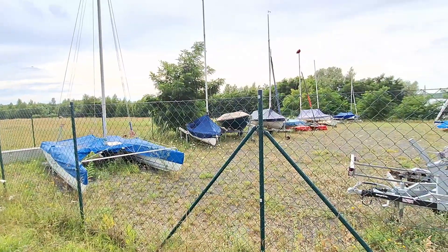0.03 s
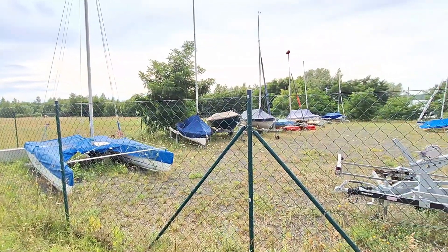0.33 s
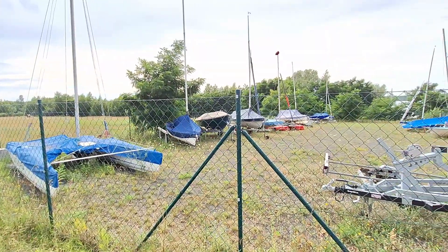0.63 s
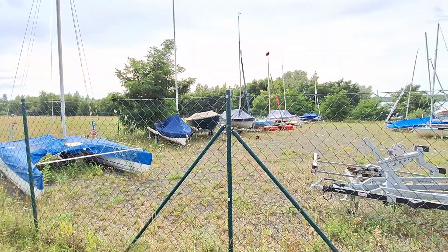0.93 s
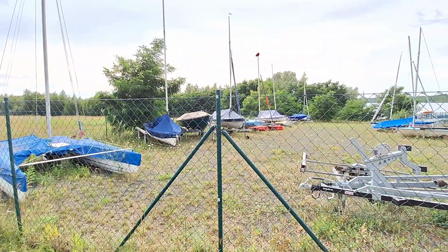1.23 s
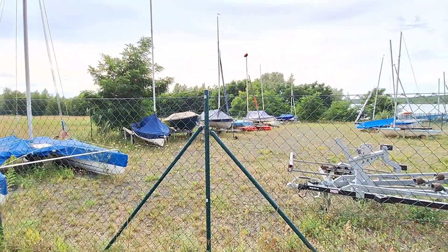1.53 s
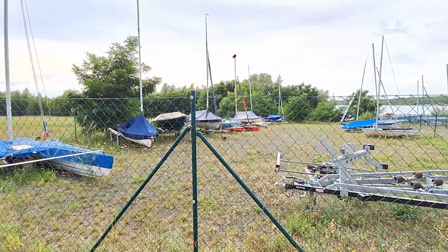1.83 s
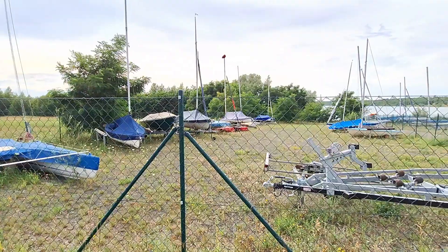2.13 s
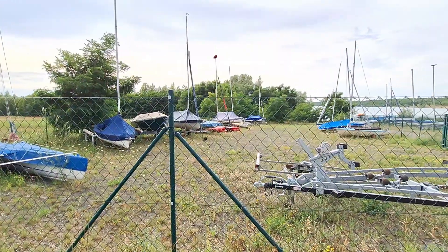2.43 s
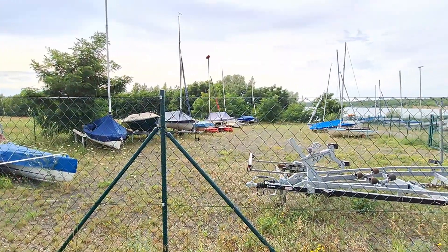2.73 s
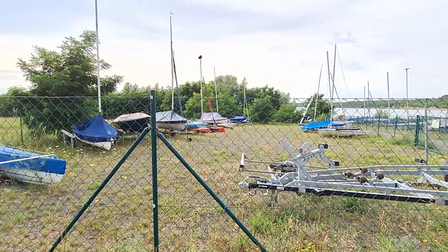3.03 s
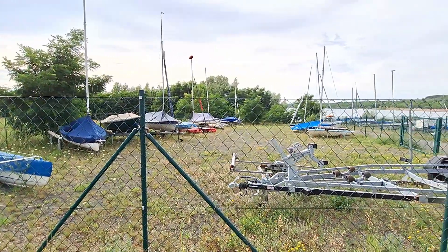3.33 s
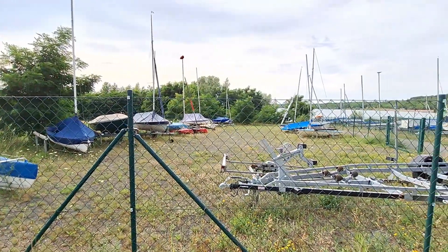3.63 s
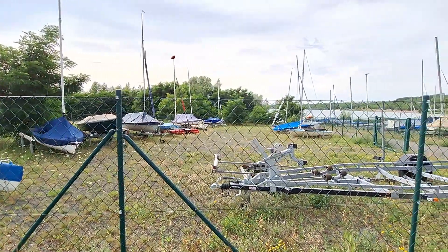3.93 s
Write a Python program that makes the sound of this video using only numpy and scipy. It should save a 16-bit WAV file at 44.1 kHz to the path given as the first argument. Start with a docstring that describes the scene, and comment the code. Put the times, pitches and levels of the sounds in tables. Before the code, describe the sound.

A wire clinks against a nearby metal mast in small clusters about once a second, ringing briefly. Wind rumbles and thumps on the microphone throughout, stronger near the end, with a faint distant rush around the boat yard.

```python
"""Halyard on a mast in a boat yard

About once a second a breeze swings a halyard against a metal mast, which clinks a few times and rings.
Wind buffets both microphone ports. Further off are light taps on another boat, bush crickets in the
grass, rustling leaves, a few faint bird whistles and the distant rush of trees and open land."""
import sys
import numpy as np
from scipy import signal
from scipy.fft import rfft, irfft, next_fast_len
from scipy.io import wavfile
from scipy.ndimage import uniform_filter1d, map_coordinates

SR = 44100
rng = np.random.default_rng(int(sys.argv[2]) if len(sys.argv) > 2 else 0)


def wav_out(sig):
    """Save sig, one row per channel (or a flat mono array), as 16-bit PCM at SR to the path in sys.argv[1]."""
    wavfile.write(sys.argv[1], SR, np.round(np.clip(np.atleast_2d(sig).T, -1, 1) * 32767).astype(np.int16))


N = 176400

NEAR_LEAD_S, FAR_LEAD_S = 0.000362, 0.00036  # how much earlier the left port hears a source
FAR_ALIKE = 0.3  # share of distant noise common to both ports
ATTACK_S = 0.0025  # rise time of struck metal


def amp(db):
    """Decibels to gain."""
    return 10 ** (np.asarray(db) / 20)


def unit(x):
    """Scale to rms 1."""
    return x / np.sqrt(np.mean(x ** 2) + 1e-20)


def along(points, hz):
    """Interpolate (frequency [Hz], value) points on a log axis."""
    f, v = np.transpose(points)
    return np.interp(np.log(hz + 1), np.log(f + 1), v)


def curve(points):
    """Interpolate (time [s], value) points to one value per sample."""
    return np.interp(np.arange(N) / SR, *np.transpose(points))


def wobble(rate):
    """A smooth random curve, rate knots a second."""
    return map_coordinates(rng.standard_normal(2048), [np.arange(N) * rate / SR], mode="mirror")


def fade(t, t60):
    """Exponential decay by 60 dB in t60 seconds."""
    return np.exp(-np.log(1000) * t / t60)


def filtered(x, response):
    """Filter x by a complex response of frequency."""
    size = next_fast_len(N + SR // 4)
    return irfft(rfft(x, size) * response(np.fft.rfftfreq(size, 1 / SR)), size)[..., :N]


def pan(db):
    """Constant-power gains for a level difference, left minus right."""
    gains = amp(np.array([[.5], [-.5]]) * db)
    return gains / np.sqrt(np.mean(gains ** 2, axis=0))


def lead(x, seconds):
    """The left port hears x earlier than the right."""
    return filtered(x, lambda hz: np.exp(1j * np.pi * hz * seconds * np.array([[1], [-1]])))


def noise(colour, alike=0):
    """Coloured stereo noise of rms 1; alike is the share common to both ports."""
    white = rng.standard_normal((3, N))
    stereo = np.sqrt(1 - alike) * white[:2] + np.sqrt(alike) * white[2]
    return unit(filtered(stereo, lambda hz: amp(along(colour, hz))))


def even(x):
    """Noise with its slow swells levelled out."""
    power = uniform_filter1d(uniform_filter1d(x ** 2, size=700, axis=1), size=500, axis=1)
    return x / np.sqrt(np.abs(power) + 1e-6)


def distant_rush():
    """Trees and open land, far from the microphone, give a steady rush."""
    # (time [s], relative level [dB])
    levels = [(0.0, -54.5), (0.21, -55), (0.48, -57), (0.95, -56.5), (2.39, -55.5), (2.67, -57.5),
              (4.0, -55)]
    # spectrum (frequency [Hz], level [dB])
    colour = [(100, 14), (280, 4.5), (360, 0.5), (420, 5), (500, -2.5), (750, 0), (1100, 2), (1550, -2),
              (2000, -1), (2500, -15.5), (3200, -27), (5000, -30.5), (9000, -68)]
    # stereo image (frequency [Hz], left minus right [dB])
    balance = [(380, 0.5), (700, 2.5), (1300, -4), (2400, -7.5), (4400, -61)]
    rush = lead(noise(colour, FAR_ALIKE), FAR_LEAD_S)
    rush = filtered(rush, lambda hz: pan(along(balance, hz)))
    return amp(curve(levels) + 6.5 + 0.74 * wobble(7.5)) * rush


def hiss():
    """A faint, wide hiss hangs behind the yard."""
    # (time [s], level [dB])
    levels = [(0, -69.5), (.6, -71), (1.3, -68), (2, -67), (2.7, -67), (3.2, -64), (4, -68)]
    # spectrum (frequency [Hz], level [dB])
    colour = [(2000, -1.5), (3500, -4), (4800, -2), (5800, 3), (7300, -1), (8050, 5), (8500, -1),
              (9200, -7.5), (11500, -7.5), (15500, -6.5)]
    return amp(curve(levels) + 0.37 * wobble(12)) * pan(-1.0) * noise(colour)


def leaves():
    """Foliage off to the right rustles as the breeze comes and goes."""
    # (time [s], relative level [dB])
    levels = [(0, -60.5), (.2, -59.5), (.45, -64.5), (1, -67.5), (1.35, -68.5), (1.9, -73.5), (2.25, -67),
              (3.1, -65), (3.5, -75), (4, -60)]
    # spectrum (frequency [Hz], level [dB])
    colour = [(1200, -18.5), (2100, 2.5), (2600, -1.5), (3100, -5.5), (3600, -16.5), (5000, -16.5),
              (9000, -47)]
    gain = amp(curve(levels) + 2 + .6 * wobble(4.8))
    return gain * pan(-11.5) * lead(noise(colour, FAR_ALIKE), FAR_LEAD_S)


def bird():
    """Thin, unsteady whistles, mostly falling, far off to the right."""
    # (time [s], length [s], start pitch [Hz], end pitch [Hz], level [dB])
    whistles = [(1.31, .09, 4750, 4800, -73), (2.13, .1, 4300, 4050, -69), (2.32, .11, 4700, 4200, -70)]
    t, out = np.arange(N) / SR, np.zeros(N)
    for s, length, start_hz, end_hz, db in whistles:
        progress = np.clip((t - s) / length, 0, 1)
        hz = start_hz + (end_hz - start_hz) * progress + 70 * wobble(500)
        out += amp(db) * np.sin(np.pi * progress) * np.sin(2 * np.pi * np.cumsum(hz) / SR)
    return pan(-5) * lead(out, NEAR_LEAD_S)


def crickets():
    """Each bush cricket rasps a narrow wing resonance, loudest as the microphone passes it."""
    # (pitch [Hz], chirps [1/s], syllables [1/s], left minus right [dB], level [dB],
    #  nearest at [s], passing time [s])
    singers = [(6640, 11, 34, 4, -69, 3.1, 1.2), (7020, 8.6, 55, -5, -68.5, 1.55, 0.99),
               (6870, 11, 27, -3, -74.5, 1.4, 0.94)]
    half_width_hz = 340

    def pulsing(rate, depth):
        drifting_rate = rate * (1 + 0.051 * wobble(4.32))
        return 1 + depth * np.sin(2 * np.pi * np.cumsum(drifting_rate) / SR)

    t, out = np.arange(N) / SR, np.zeros((2, N))
    for pitch_hz, chirps, syllables, side_db, db, nearest_s, passing_s in singers:
        rasp = rng.standard_normal((2, N))
        wing = filtered(rasp, lambda hz: 1 / (1 + ((hz - pitch_hz) / half_width_hz) ** 2))
        song = unit(wing * pulsing(chirps, depth=0.43) * pulsing(syllables, depth=0.76))
        out += amp(db) * pan(side_db) * song / (1 + ((t - nearest_s) / passing_s) ** 2)
    return out


def tinks():
    """A small fitting on another boat rings under light taps."""
    # (time [s], level [dB])
    taps = [(0.256, -62.5), (0.55, -69.5), (1.396, -60), (2.262, -66)]
    # modes of the fitting (frequency [Hz], relative level [dB], t60 [s])
    modes = [(7900, 2.5, 0.12), (11300, -11.5, 0.23)]
    t, out = np.arange(SR // 4) / SR, np.zeros(N + SR)
    rise = 1 - np.exp(-t / ATTACK_S)
    ring = rise * sum(amp(db) * fade(t, t60) * np.sin(2 * np.pi * hz * t) for hz, db, t60 in modes)
    for s, db in taps:
        out[round(s * SR):][:len(t)] += amp(db) * ring
    return out[:N]


def yard_echo(x):
    """Hulls and trees around the microphone return a thin, diffuse echo."""
    t = np.arange(SR // 2) / SR
    tail = rng.standard_normal((2, len(t))) * fade(t, t60=0.4) * (1 - np.exp(-t / 0.0051))
    return amp(-9) * signal.fftconvolve(x, tail / np.linalg.norm(tail[0]), axes=1)[:, :N]


def buffeting():
    """Wind right on the microphone makes a lumpy rumble, different at each port."""
    # strength of the breeze (time [s], relative level [dB])
    breeze = [(0, -39.5), (.25, -36.5), (.5, -41), (.8, -36), (1.0, -34), (1.35, -31), (1.7, -32.5),
              (1.9, -36.5), (2.05, -30), (2.35, -33.5), (2.5, -40), (2.75, -43), (2.95, -38.5), (3.15, -30),
              (3.4, -30.5), (3.65, -32.5), (3.8, -32), (4, -27.5)]
    # which port takes the wind (time [s], left minus right [dB])
    side = [(0, -3.5), (.35, -11), (.7, -2), (1.8, -6), (2.4, -5.5), (2.9, 2), (3.3, 5.5), (3.6, 4),
            (4, 6.5)]
    # spectrum (frequency [Hz], level [dB])
    colour = [(20, -34), (32, -18.5), (48, -0.5), (65, 0.5), (90, -6), (130, -16.5), (200, -32),
              (300, -40.5), (500, -61.5), (1000, -78), (2000, -120)]
    steady = even(noise(colour))
    lumps = amp(3 * np.array([wobble(20), wobble(18)]))
    return amp(curve(breeze) + 2) * pan(curve(side)) * unit(steady * lumps)


def eddies():
    """Single eddies thump the microphone ports as they pass; hard ones also slap."""
    # (time [s], level [dB], Gaussian width [s], left minus right [dB], hardness [dB])
    passes = [(0.293, -19.5, 0.013, -40, -13.5), (0.761, -29, 0.031, -11, -15),
              (0.832, -21.5, 0.0056, -12, -7.5), (1.148, -24, 0.014, -5, -3),
              (1.327, -23, 0.038, -6.5, -10.5), (1.485, -30, 0.025, -6, -8), (1.603, -26, 0.01, -4, -1),
              (1.692, -26.5, 0.014, -4.5, -15), (1.81, -26.5, 0.017, -7, -10),
              (1.991, -22, 0.013, -11, -17), (2.631, -29, 0.0079, -10, -8), (2.765, -29, 0.0084, -2, -8.5),
              (3.086, -20, 0.012, 9.5, -2), (3.219, -22, 0.0098, 24, 0.5), (3.378, -22, 0.038, 16.5, 2),
              (3.437, -17, 0.0078, 18, -10), (3.51, -20, 0.0074, 10.5, 5.5), (3.571, -18, 0.016, 5, 9),
              (3.654, -18.5, 0.014, -4, -5.5), (3.718, -17, 0.01, -11.5, -1),
              (3.927, -17.5, 0.014, -6.5, 3.5)]
    # spectrum of the low thump (frequency [Hz], level [dB])
    thump_colour = [(20, -27), (40, -16), (65, 2), (95, 0), (150, -14), (230, -30.5), (350, -55.5),
                    (700, -78.5), (1400, -120)]
    # spectrum of the slap above it (frequency [Hz], level [dB])
    slap_colour = [(50, -7.5), (120, -1.5), (180, 0.5), (260, -10), (380, -15.5), (550, -36.5), (1000, -62),
                   (2000, -110)]
    thump, slap = even(noise(thump_colour)), even(noise(slap_colour))
    t, out = np.arange(N) / SR, np.zeros((2, N))
    for s, db, width_s, side_db, hard_db in passes:
        swell = np.exp(-.5 * ((t - s) / width_s) ** 2)
        out += amp(db) * pan(side_db) * swell * (thump + amp(hard_db - 14) * slap)
    return out


def halyard():
    """The wire strikes a nearby mast: each blow gives a dense clatter and rings unsteady metal modes."""
    # (time [s], clatter level [dB], relative level of the low, main, upper, bright, top modes [dB])
    strikes = [(0.001, -62.5, -49, -51.5, -70, -73, -70), (0.0235, -46, -43.5, -44.5, -66, -52, -53),
               (0.0879, -48, -48.5, -49, -69, -55, -70), (0.842, -63.5, -72, -70, -73, -74, -82),
               (0.9485, -49, -57, -63, -67, -70, -47.5), (1.013, -50, -58, -37, -50, -67, -46),
               (1.094, -56, -72, -54, -69, -74, -80), (1.104, -56, -70, -55, -71, -72, -80),
               (1.118, -61, -66, -54, -72, -67, -89), (1.168, -63, -76, -61, -74, -67, -85),
               (1.8515, -62.5, -62, -72, -80, -85, -85), (1.885, -65, -80, -67, -58, -80, -85),
               (1.9615, -50.5, -56, -63, -61, -70, -68), (2.0128, -49.5, -46, -46, -72, -71, -67),
               (2.0675, -38.5, -30.5, -35, -47, -50, -47), (2.904, -52.5, -66, -54, -70, -67, -59),
               (2.954, -64.5, -62, -58, -74, -78, -80), (2.9955, -48.5, -58, -46, -58, -62, -69),
               (3.191, -55, -59.5, -58.5, -85, -73, -83), (3.913, -50, -55, -52, -58, -69, -80),
               (3.9315, -57, -56, -73, -63, -58, -76.5), (3.9645, -54.5, -54, -57, -57, -56, -76)]
    # modes of mast and fitting in those five groups (frequency [Hz], relative level [dB], t60 [s])
    mode_groups = [
        [(3031, -27, .1), (4601, -1, .135), (4677, -7, .06), (4718, -9, .09)],
        [(4985, -1, .125), (5015, -7, .05), (5076, -8, .09), (5131, -12, .08), (5461, -16, .08)],
        [(6501, -11, .08), (7580, 1, .12)],
        [(8120, 3, .11), (8645, -13, .1)],
        [(10860, -11, .05), (11920, 0, .07)],
    ]
    # spectrum of the wire's clatter (frequency [Hz], level [dB])
    colour = [(500, -46.5), (1500, -9), (2800, -6), (3700, -6), (4400, 3), (5100, 9), (5800, 1.5),
              (6500, 2), (8100, -2.5), (9200, -8.5), (11000, -7), (12300, -8.5), (13500, -12.5),
              (15800, -17)]
    # stereo image of the mast (frequency [Hz], left minus right [dB])
    balance = [(3000, -5), (5000, -10), (7500, 0.5), (12000, -1.5)]
    ring_db, flutter_db, drift_rad = -0.5, 1.5, .28
    t = np.arange(SR // 4) / SR

    def wander():
        return np.interp(t, np.linspace(0, t[-1], num=40), rng.standard_normal(40))

    rise = 1 - np.exp(-t / ATTACK_S)
    buzz = amp(-11) * fade(t, t60=0.25)  # the wire goes on buzzing after the blow
    burst = rise * (fade(t, t60=0.084) + buzz)
    ring, clatter_power = np.zeros(N + SR), np.zeros(N + SR)
    for s, clatter_db, *group_levels in strikes:
        start = round(s * SR)
        span = slice(start, start + len(t))
        clatter_power[span] += (amp(clatter_db) * burst) ** 2
        for group_db, modes in zip(group_levels, mode_groups):
            swell = rise * amp(ring_db + group_db + flutter_db * wander())
            for hz, mode_db, t60 in modes:
                phase = 2 * np.pi * (hz * t + rng.uniform()) + drift_rad * wander()
                ring[span] += amp(mode_db) * swell * fade(t, t60) * np.sin(phase)
    chatter = amp(wobble(300))  # the level flickers by about 1 dB
    clatter = np.sqrt(clatter_power[:N]) * chatter * noise(colour, alike=0.3)
    clinks = lead(ring[:N] + clatter, NEAR_LEAD_S)
    return filtered(clinks, lambda hz: pan(along(balance, hz)))


def scene():
    """The rigging and the bird sound into the yard; wind and insects surround the microphone."""
    direct = halyard() + tinks() + bird()
    echo = yard_echo(direct)
    wind = buffeting() + eddies()
    background = distant_rush() + hiss() + leaves() + crickets()
    return background + wind + echo + direct


def record(dry):
    """The recorder keeps nothing above its band limit."""
    top_hz = 15830
    return filtered(dry, lambda hz: hz < top_hz)


dry = scene()
out = record(dry)
wav_out(out)
```